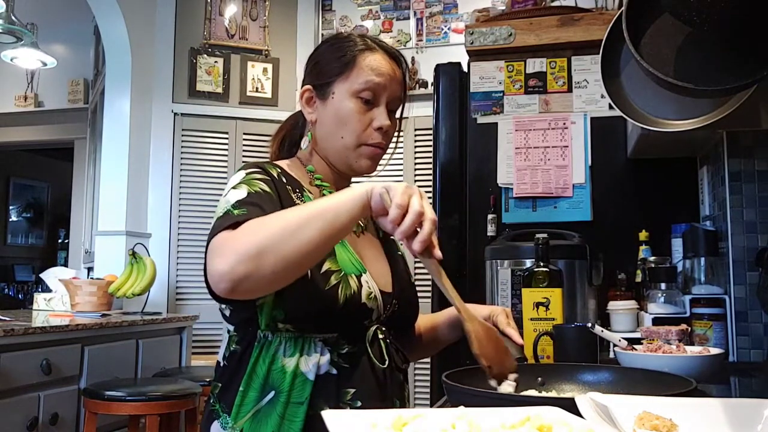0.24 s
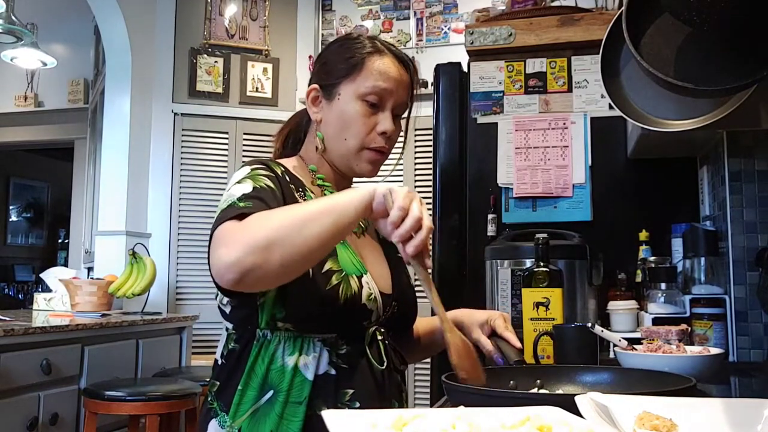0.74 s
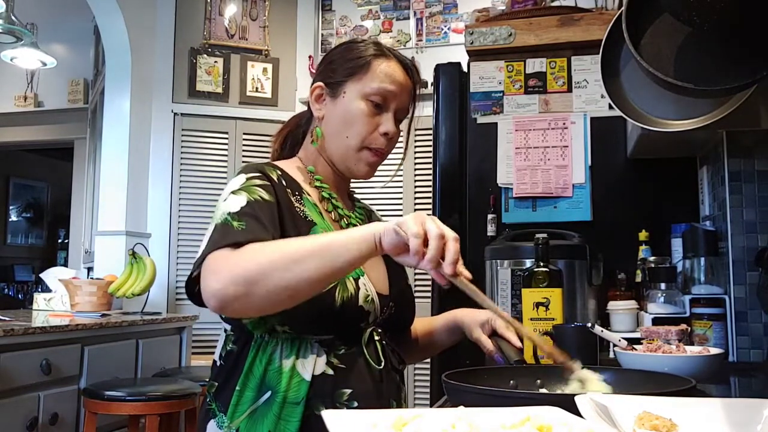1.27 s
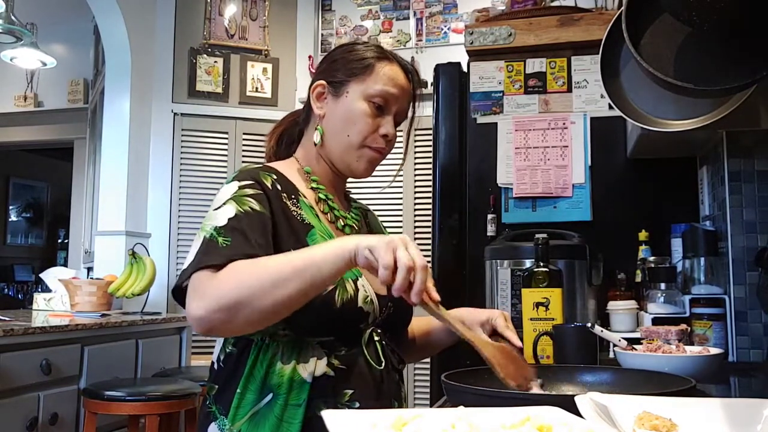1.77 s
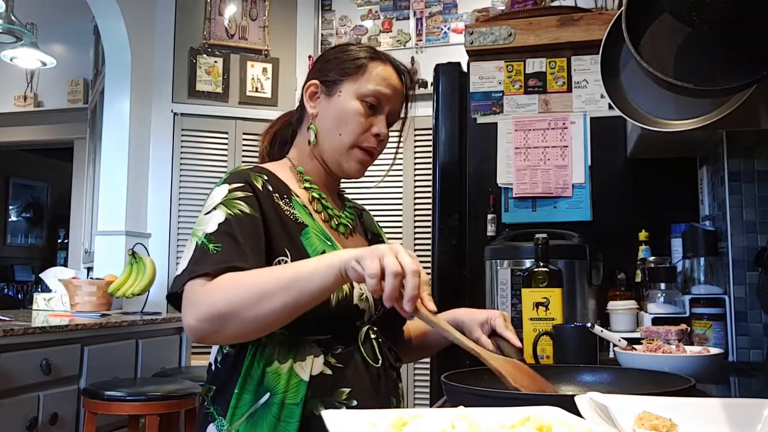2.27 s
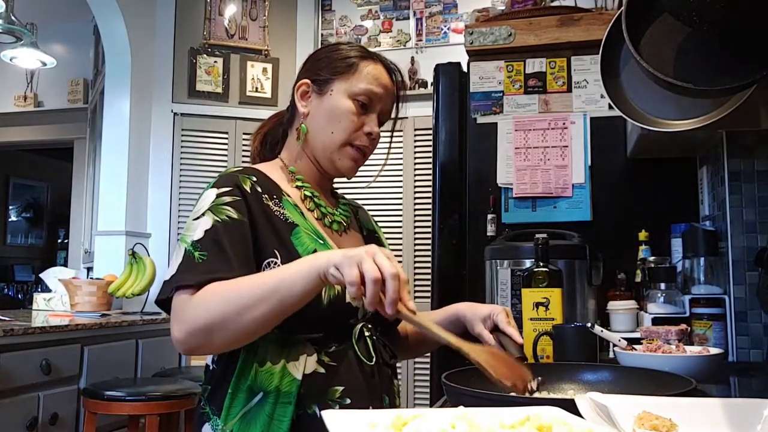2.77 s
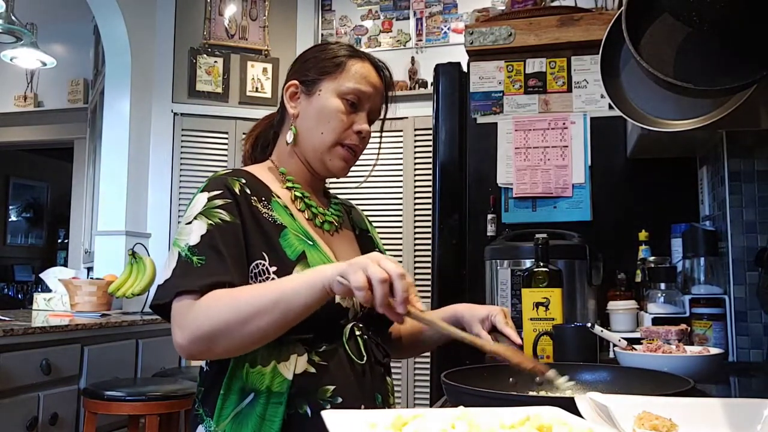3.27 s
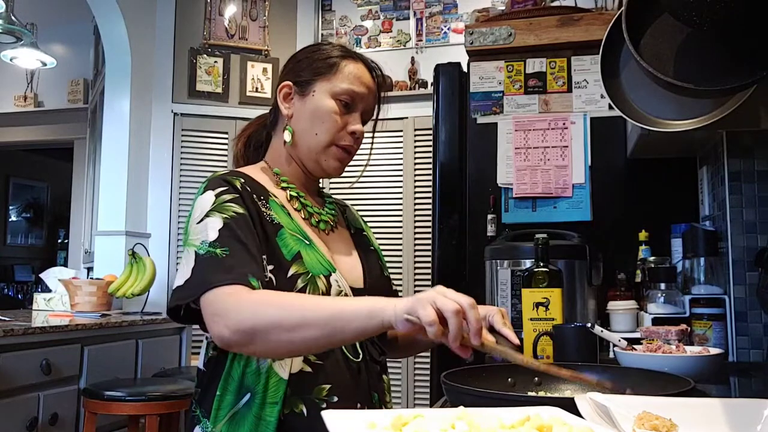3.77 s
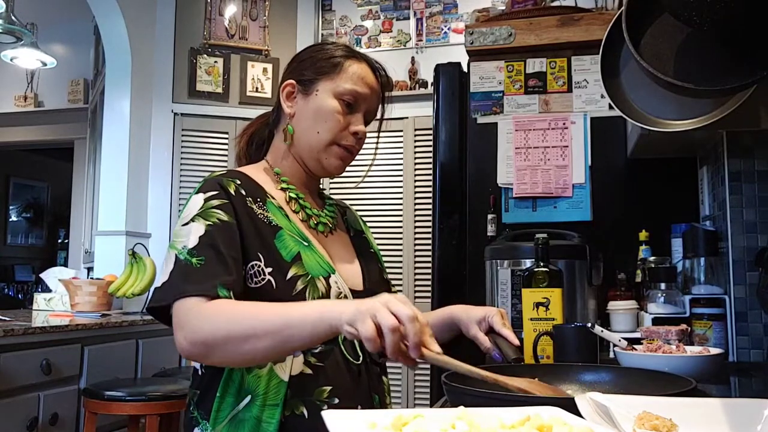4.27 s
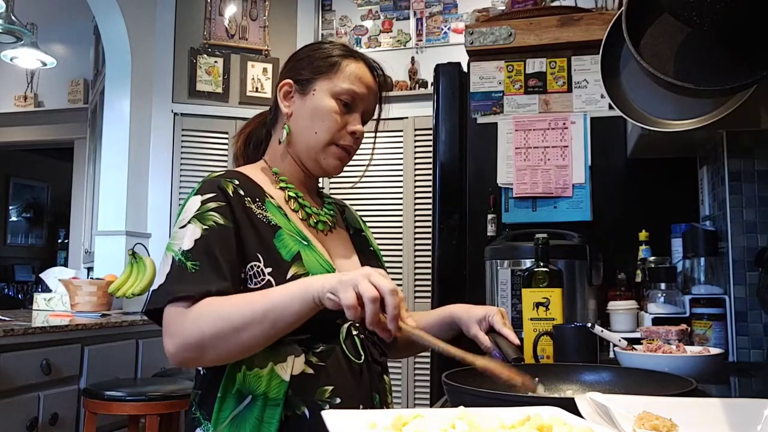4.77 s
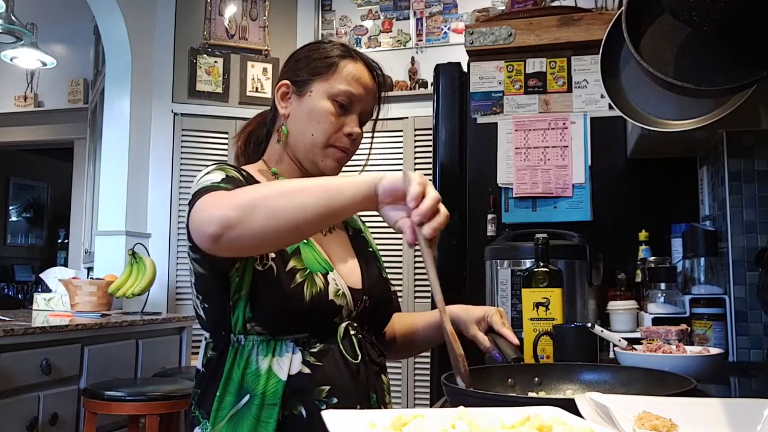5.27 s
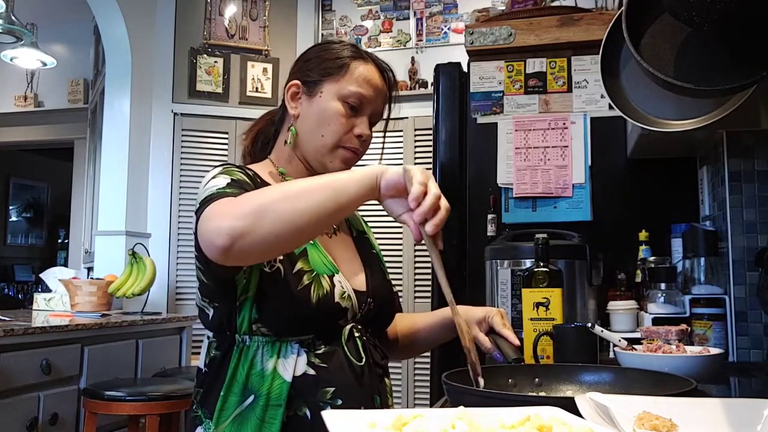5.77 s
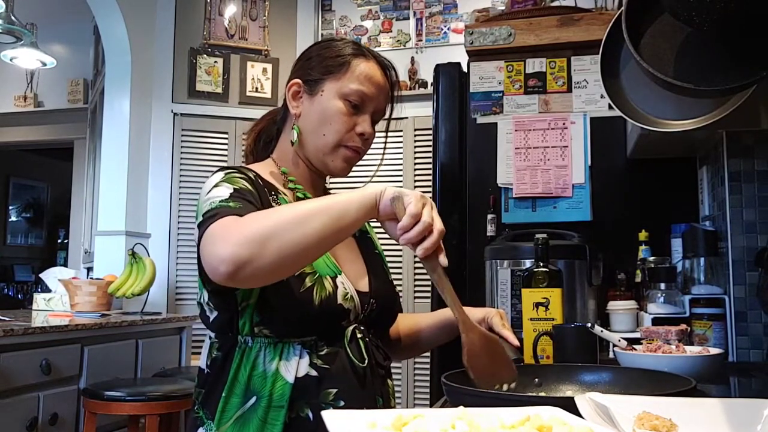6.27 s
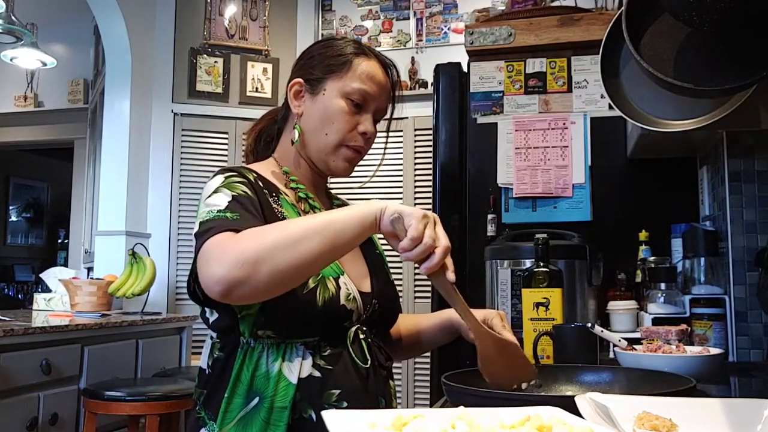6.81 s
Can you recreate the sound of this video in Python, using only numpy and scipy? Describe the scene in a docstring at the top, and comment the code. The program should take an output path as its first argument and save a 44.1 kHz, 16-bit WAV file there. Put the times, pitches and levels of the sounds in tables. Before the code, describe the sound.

Onions fry with a steady, fine, bright sizzle and low crackle, heard close in stereo, the left side edged with a whistling treble. A low appliance hum and rumble sit faintly behind. From 0 to 1.2 seconds a wooden spatula knocks the pan's floor and rim irregularly, with hollow tocks, short clacks and noisy tails; the strongest fall near 0.1, 0.5 and 1.1. From 1.2 to 2.2 soft swishes sweep onions over hot metal, with a duller tap at 1.4. Knocks return around 2.6 to 3.1, then another swish. Around 4 the pan rocks with low thuds and more swishing; taps follow at 4.3 and 4.65, and a sharp oil spit snaps at 4.7. From 5.1 to 6.5 tapping becomes frequent, strongest near 6.0. It then settles to sizzling, with a tiny spit near 6.9 and a final dull knock at 7.0. Short kitchen echoes follow the blows.

```python
"""Onions sizzle in a frying pan in a home kitchen: random steam pops over hiss.
A wooden spatula stirs them, knocking on the pan's floor and rim: decaying modes, bursts and a noisy tail.
The pan rocks on its grate, the stove thuds under it, and oil spits now and then as short noise bursts.
Behind them an appliance hums in sines over a noise rumble. Room echoes follow every blow and spit.
A stereo microphone pair listens close by; its left port whistles with a strong treble resonance."""
import sys
import numpy as np
from scipy import signal
from scipy.fft import rfft, irfft, next_fast_len
from scipy.io import wavfile
from scipy.ndimage import uniform_filter1d, map_coordinates

SR = 44100
rng = np.random.default_rng(int(sys.argv[2]) if len(sys.argv) > 2 else 0)


def to_wav(sig):
    """Store sig (one row per channel, or 1-D mono) as 16-bit WAV at the path in sys.argv[1].

    Samples outside -1..1 are clipped; the rate is SR.
    """
    pcm = np.clip(np.atleast_2d(sig), -1, 1) * 32767
    pcm = np.round(pcm).astype(np.int16)
    wavfile.write(sys.argv[1], SR, pcm.T)  # frames by channels


N = 310720
RING = np.arange(17000) / SR  # time after a blow [s]
# rows that set left and right apart
LEFT_RIGHT = np.array([[1], [-1]])


def amp(db):
    """Decibels to gain."""
    return 10 ** (np.asarray(db) / 20)


def unit(x):
    """x at rms 1."""
    return x / np.sqrt(np.mean(x ** 2) + 1e-20)


def crest(x, size=350):
    """A stereo blow scaled so that its loudest moment, size samples long, has rms 1."""
    power = uniform_filter1d(np.mean(x ** 2, 0), size)
    return x / np.sqrt(power.max() + 1e-20)


def along(points, hz):
    """(frequency, value) points read on a log frequency axis."""
    f, v = np.transpose(points)
    return np.interp(np.log(hz + 1), np.log(f + 1), v)


def wobble(rate):
    """A smooth random curve, rate knots a second."""
    knots = rng.standard_normal(int(N * rate / SR) + 4)
    return map_coordinates(knots, [np.arange(N) * rate / SR])


def filtered(x, response, size=8192):
    """x times a response of frequency."""
    m = next_fast_len(x.shape[-1] + size)
    spectrum = rfft(x, m) * response(np.fft.rfftfreq(m, 1 / SR))
    return irfft(spectrum, m)[..., :x.shape[-1]]


def add(track, s, sound):
    """Mix a sound into the track at time s."""
    part = track[:, max(round(s * SR), 0):][:, :sound.shape[1]]
    part += sound[:, :part.shape[1]]


# how alike the two microphones hear: (frequency [Hz], left-right likeness [-1 to 1])
LIKENESS = [(110, 0.98), (280, 0.96), (600, 0.55), (1200, 0.068), (2200, -0.17), (4000, -0.038)]


def port_angle(hz):
    """Half the angle between the ports' signals, whose cosine is their likeness."""
    return np.arccos(np.clip(along(LIKENESS, hz), -1, 1)) / 2


def spread(pair, spectrum):
    """Two unrelated signals become a coloured stereo sound of rms 1, alike in the bass."""
    def mid_side(hz):
        angle = port_angle(hz)
        return amp(along(spectrum, hz)) * [np.cos(angle), np.sin(angle)]

    mid, side = filtered(pair, mid_side)
    return unit(np.array([mid + side, mid - side]))


def ring(modes, scatter_db, attack, detune=0.012):
    """A struck body: each blow shifts its modes' strength and pitch; high modes reach the ports out of step."""
    hz, db, t60 = np.transpose(modes)[:, :, None]
    size = amp(db + scatter_db * rng.standard_normal(hz.shape) - 60 * RING / t60)
    apart = port_angle(hz) * rng.choice([-1, 1], hz.shape)
    detuned = hz * (1 + detune * rng.standard_normal(hz.shape))
    phase = 2 * np.pi * (detuned * RING + rng.random(hz.shape))
    pair = np.array([np.sum(size * np.sin(phase + side * apart), 0) for side in (1, -1)])
    return crest(pair * (1 - np.exp(-RING / attack)))


def favoured(modes, place_hz, slope_db):
    """The place of a blow favours the modes near one pitch; the others fall by slope_db an octave."""
    return [(hz, db - slope_db * abs(np.log2(hz / place_hz)), t60) for hz, db, t60 in modes]


def burst(spectrum, t60, attack=0.0013):
    """Dense, quickly dying modes of a contact, drawn as coloured noise."""
    noise = spread(rng.standard_normal((2, len(RING))), spectrum)
    return crest(noise * amp(-60 * RING / t60) * (1 - np.exp(-RING / attack)))


# how long the kitchen rings: (frequency [Hz], t60 [s])
ROOM_DECAY = [(90, 0.7), (350, 0.39), (900, 0.36), (3000, 0.4), (10000, 0.13)]


def kitchen(x, wet_db, early_db=-9, delay=0.0066):
    """A blow with quick echoes off the counter and the room's answer, drawn anew each time."""
    white = spread(rng.standard_normal((2, len(RING))), [(1, 0)])
    hz, t, z = signal.stft(white, SR, nperseg=256)
    decayed = z * amp(-60 * t / along(ROOM_DECAY, hz)[:, None])
    tail = signal.istft(decayed, SR, nperseg=256)[1][:, :len(RING)]
    tail = tail * (1 - np.exp(-(RING / delay) ** 2))
    near = rng.standard_normal(tail.shape) * (RING > 0.002) * amp(-60 * RING / 0.051)
    # both answers are scaled by their left channel
    answer = amp(wet_db) * tail / np.linalg.norm(tail[0]) + amp(early_db) * near / np.linalg.norm(near[0])
    return x + signal.fftconvolve(x, answer, axes=1)[:, :len(RING)]


# the appliance's tones, ahead of the microphones: (frequency [Hz], level [dB])
HUM_TONES = [(39.5, -58.5), (79, -62), (120, -67.5)]
# the room's low rumble: (frequency [Hz], relative density [dB per Hz])
ROOM_RUMBLE = [(15, -22), (28, -4), (43, 10.5), (60, -25), (82, 3), (120, -4.5), (170, -23), (290, -9),
               (420, -17.5), (850, -19), (2000, -27)]


def appliance():
    """A motor hums, unsteady in level and phase, over the room's low rumble."""
    t = np.arange(N) / SR
    hum = np.zeros(N)
    for hz, db in HUM_TONES:
        level = amp(db + 0.31 * wobble(3.15)) * np.sqrt(2)
        hum += level * np.sin(2 * np.pi * hz * t + 0.32 * wobble(2.95))
    return hum + amp(-56.5) * spread(rng.standard_normal((2, N)), ROOM_RUMBLE)


# modes of the stove top: (frequency [Hz], relative level [dB], t60 [s])
STOVE_MODES = [(77.6, -6.5, 0.2), (90.7, 1.5, 0.18), (120, -2, 0.13)]


def stove_thud():
    """The stove top swings slowly into its low modes."""
    return ring(STOVE_MODES, scatter_db=3.5, attack=0.0058)


# modes of the pan's body: (frequency [Hz], relative level [dB], t60 [s])
PAN_MODES = [(240.7, -6.5, 0.19), (292.7, 2.5, 0.16), (347.4, -2, 0.18), (415.4, -9.5, 0.14),
             (490.4, -3.5, .11)]
# the pan's thump on the grate: (frequency [Hz], relative density [dB per Hz])
GRATE_THUMP = [(130, -23), (200, -8.5), (300, 2), (420, 1.5), (600, 1), (900, -29)]


def pan_body():
    """The pan bends and thumps on its grate."""
    bend = ring(PAN_MODES, scatter_db=2.5, attack=0.0055, detune=0.0049)
    thump = burst(GRATE_THUMP, t60=0.26, attack=0.00083)
    return crest(bend + amp(-3.5) * thump)


# the pushed pan rocks on its grate: (time [s], stove level [dB], pan level [dB]), ahead of the echoes
PAN_ROCKS = [(0.399, -42, -52), (0.568, -44, -65), (0.73, -41, -47), (1.404, -49, -41.5), (1.76, -48, -72),
             (2.248, -43.5, -62), (2.525, -51, -49.5), (3.148, -43, -40.5), (3.456, -44.5, -65),
             (3.765, -47, -51), (3.982, -37, -44.5), (4.193, -37, -54), (4.318, -44, -41),
             (4.769, -51, -43.5), (4.853, -51, -43), (6.763, -43.5, -72)]


def rocks():
    """Pushing the onions tips the pan softly against the grate."""
    out = np.zeros((2, N))
    for s, stove_db, pan_db in PAN_ROCKS:
        low = amp(stove_db) * stove_thud() + amp(pan_db) * pan_body()
        add(out, s, kitchen(low, wet_db=-17, early_db=-22))
    return out


# oil spits: (time [s], level [dB]), ahead of the echoes
OIL_SPITS = [(4.5922, -40.5), (4.7062, -26.5), (4.8737, -43), (6.8625, -42.5)]
# colour of a spit: (frequency [Hz], relative density [dB per Hz])
SPIT_COLOUR = [(1000, -9), (3000, 2.5), (5000, 2), (8500, 0), (11000, -19), (15000, -17)]


def spits():
    """Larger drops of water burst in the hot oil."""
    out = np.zeros((2, N))
    for s, db in OIL_SPITS:
        spit = amp(db) * burst(SPIT_COLOUR, t60=0.025, attack=0.00057)
        add(out, s, kitchen(spit, wet_db=-4.0, early_db=-5.5))
    return out


# modes of the wooden spatula: (frequency [Hz], relative level [dB], t60 [s])
SPATULA_MODES = [(728, -1, 0.057), (774, -5, 0.029), (836, -3, 0.054), (879, -4.5, 0.065)]


def spatula_tock(spatula_hz):
    """The wooden spatula rings mostly near one pitch."""
    modes = favoured(SPATULA_MODES, spatula_hz, slope_db=46.0)
    return ring(modes, scatter_db=1.5, attack=0.00063, detune=0.0023)


# modes of the pan's floor: (frequency [Hz], relative level [dB], t60 [s])
FLOOR_MODES = [(590, -9.5, 0.023), (641, -1.5, 0.023), (910, -14.5, 0.052), (1064, -0.5, 0.038),
               (1150, -6, 0.069), (1275, -4.5, 0.044), (1406, -16.5, 0.052), (1526, -15.5, 0.068)]
# clatter of wood on the floor: (frequency [Hz], relative density [dB per Hz])
FLOOR_CLATTER = [(200, -5.5), (450, -3), (900, 5.5), (1250, 2), (1650, -2), (2200, -15), (3000, -34)]


def floor_clack():
    """The pan's floor rings briefly under a clatter."""
    tone = ring(FLOOR_MODES, scatter_db=4.5, attack=0.0005)
    return crest(tone + amp(-1.5) * burst(FLOOR_CLATTER, t60=0.15, attack=0.00022))


# modes of the pan's rim: (frequency [Hz], relative level [dB], t60 [s])
RIM_MODES = [(2263, -5, 0.12), (2357, 1, 0.16), (2424, -2, 0.074), (2612, 3, 0.038), (2953, 1, 0.061)]


def rim_ring(place_hz):
    """The pan's rim, struck at one place."""
    modes = favoured(RIM_MODES, place_hz, slope_db=14)
    return ring(modes, scatter_db=5.5, attack=0.0011, detune=0.0059)


# spatula on pan: (time [s], strength [dB], weight behind the blow [0-1],
# hardness [0 on onion to 1 on bare metal], place [0 floor to 1 rim], spatula pitch [Hz])
SPATULA_KNOCKS = [(0.001, -40, 0.29, 0.43, 0.78, 734), (0.075, -33.5, 1, 0.36, 0.17, 818.0),
                  (0.121, -27.0, 0.71, 0.65, 0.45, 890.0), (0.351, -39.5, 0.35, 0.51, 0.69, 800),
                  (0.488, -27.5, 0.82, 0.54, 0.42, 899.0), (0.683, -35.5, 0.63, 0.7, 0.46, 860),
                  (0.808, -38.0, 1, 0.43, 0.51, 686.0), (1.012, -31, 0.58, 0.86, 0.54, 894.0),
                  (1.093, -27.5, 1, 0.19, 0.21, 912.0), (1.146, -26.5, 0.98, 0.64, 0.32, 880.0),
                  (1.439, -36.5, 0.58, 0.12, 0.32, 850.0), (2.609, -30.5, 0.6, 0.45, 0.42, 888.0),
                  (2.809, -34, 0.5, 0.072, 0.65, 760), (3.083, -36, 0.0, 0.4, 0.073, 834.0),
                  (3.921, -51.5, 0.46, 0.44, 0.098, 825), (4.29, -33, 0.2, 0.55, 0.23, 710.0),
                  (4.559, -40, 0.01, 0.49, 0.061, 750), (4.649, -30.5, 0.63, 0.3, 0.38, 870),
                  (5.106, -39.0, 0.36, 1.0, 0.57, 833), (5.303, -38.0, 0.68, 0.0, 0.57, 814),
                  (5.382, -31.5, 0.63, 0.36, 0.3, 890), (5.555, -37.0, 0.25, 0.91, 0.45, 777),
                  (5.902, -33.0, 0.47, 0.67, 0.82, 790), (6.013, -28.5, 0.94, 0.59, 0.27, 850),
                  (6.168, -35.0, 0.59, 0.0, 0.94, 845.0), (6.3, -38.5, 0.97, 0.33, 0.37, 912.0),
                  (6.457, -40.5, 0.73, 0, 1.0, 850), (7.007, -33.5, 0.58, 0.0, 0.89, 845)]
# how each part answers a blow: (level over its strength [dB], added by full weight [dB],
# by full hardness [dB], at the rim [dB])
PART_ANSWERS = {"stove": (-11, 11, -1, 2.5), "pan": (-5, 6, 0.5, -1), "spatula": (13.5, -21, 0, 0),
                "floor": (10, 1, -0.5, -23.5), "rattle": (-1.5, 0.5, 20.5, -32), "rim": (-25, -1, 27, 6.5),
                "click": (-47.5, 22.5, 34, -4.5)}
# rattle of spatula against pan, fading towards the rim: (frequency [Hz], relative density [dB per Hz])
RATTLE_COLOUR = [(1000, -33), (1550, -34), (1850, 3), (2300, -4), (2750, -4.5), (3300, -8), (6000, -56)]
# click of a hard contact: (frequency [Hz], relative density [dB per Hz])
CLICK_COLOUR = [(1500, -32), (3200, 9.5), (5000, 10), (7000, 0), (10000, -29), (15000, -30)]
RIM_HZ, RIM_SAG_HZ = 2850, 700  # the rim's favoured pitch at no weight; its fall under full weight
DULL_HZ, BITE_OCTAVES = 2570, 2.6  # treble edge of a cushioned blow; its rise for a hard, heavy one
RIM_LEFT_DB = 4.2  # left over right, for the tock and clack of a blow at the rim; the floor is central


def knocks():
    """Light taps ring mostly the wooden spatula; heavy blows also shake pan and stove, hard ones the rim."""
    out = np.zeros((2, N))
    for s, db, weight, hardness, place, spatula_hz in SPATULA_KNOCKS:
        blow = [1, weight, hardness, place]
        gain = {part: amp(db + np.dot(answer, blow)) for part, answer in PART_ANSWERS.items()}
        low = gain["stove"] * stove_thud() + gain["pan"] * pan_body()
        middle = gain["spatula"] * spatula_tock(spatula_hz) + gain["floor"] * floor_clack()
        middle = middle * amp(RIM_LEFT_DB * place * LEFT_RIGHT / 2)
        rattle = gain["rattle"] * burst(RATTLE_COLOUR, t60=0.08, attack=0.0017)
        rim = gain["rim"] * rim_ring(RIM_HZ - RIM_SAG_HZ * weight)
        click = gain["click"] * burst(CLICK_COLOUR, t60=0.1, attack=0.00054)
        # a light contact, or one cushioned by onion, cuts off the treble steeply
        corner_hz = DULL_HZ * 2 ** (BITE_OCTAVES * hardness * weight)
        high = filtered(rattle + rim + click, lambda hz: 1 / np.sqrt(1 + (hz / corner_hz) ** 20))
        add(out, s, kitchen(low, wet_db=-14.5, early_db=-25.0))
        add(out, s, kitchen(middle + high, wet_db=-7.8, early_db=-9.5))
    return out


# diffuse noisy tail after a knock: level relative to its strength, rise and fading time constants
TAIL_DB, TAIL_RISE_S, TAIL_FADE_S = -14, 0.024, 0.12


def knock_tails(t):
    """Level of the diffuse noisy tails: each rises after its knock and fades; their powers add."""
    power = np.zeros(N)
    for s, db, *_ in SPATULA_KNOCKS:
        age = np.clip(t - s, 0, 2)
        swell = (1 - np.exp(-age / TAIL_RISE_S)) * np.exp(-age / TAIL_FADE_S)
        power += (amp(db + TAIL_DB) * swell) ** 2
    return np.sqrt(power)


def bubbles(spectrum, rate, size_db, hiss_db):
    """Tiny steam bubbles burst at random, rate a second, over the blur of their own echoes."""
    sizes = amp(size_db * rng.standard_normal((2, N)).clip(-3, 3))
    pops = (rng.random((2, N)) < rate / SR) * rng.choice([-1, 1], (2, N)) * sizes
    return spread(unit(pops) + amp(hiss_db) * rng.standard_normal((2, N)), spectrum)


# onions swept over hot metal: (time of the middle [s], time from there to 1/e [s], level [dB])
ONION_SWISHES = [(1.245, 0.16, -46.5), (1.49, 0.092, -40.5), (1.835, 0.087, -40.5), (2.11, .077, -41),
                 (2.816, 0.045, -51), (3.177, .068, -45), (3.982, 0.16, -45), (4.175, 0.086, -44.5),
                 (4.81, 0.14, -46), (5.56, 0.092, -46.5), (6.644, 0.14, -60)]
# colour of a swish: (frequency [Hz], relative density [dB per Hz])
SWISH_COLOUR = [(500, -40), (1500, -3.5), (2500, 1.5), (4500, 0), (6500, -4), (10000, -6), (15000, -5.5)]
# colour of the fine sizzle: (frequency [Hz], relative density [dB per Hz])
SIZZLE_COLOUR = [(200, -26), (700, -29), (1500, -15), (2500, 1), (3500, -2.5), (5000, 0.5), (6500, -4),
                 (9000, -2.5), (12500, -3.5), (15500, -2.5)]
# colour of the low crackle and the knocks' tails: (frequency [Hz], relative density [dB per Hz])
CRACKLE_COLOUR = [(150, -14), (400, -11.5), (900, -4), (1500, -5), (2200, 1), (3000, -2.5), (4500, -6.5),
                  (9000, -28)]
SIZZLE_DB, CRACKLE_DB = -42.5, -48.5  # fine sizzle and low crackle of onions at rest, before they flare


def frying():
    """A fine sizzle, a low crackle that carries the knocks' noisy tails, and swishes of onion on hot metal."""
    t = np.arange(N) / SR
    # pockets of moisture flare up and dry out [dB]
    flare = 0.3 * wobble(3) + 0.35 * wobble(9) + 0.5 * wobble(35)
    sizzle = amp(SIZZLE_DB + flare) * bubbles(SIZZLE_COLOUR, rate=2500, size_db=2.5, hiss_db=5.0)
    crackle_level = np.hypot(amp(CRACKLE_DB), knock_tails(t)) * amp(flare)
    crackle = crackle_level * bubbles(CRACKLE_COLOUR, rate=700, size_db=2.5, hiss_db=3.5)
    sweep = np.zeros(N)
    for middle, length, db in ONION_SWISHES:
        sweep += amp(db) * np.exp(-np.minimum(((t - middle) / length) ** 2, 20))
    swish = sweep * amp(2.2 * wobble(45)) * bubbles(SWISH_COLOUR, rate=1500, size_db=3.5, hiss_db=5.5)
    return sizzle + crackle + swish


def scene():
    """Everything at the stove, from the background to the onions."""
    return appliance() + rocks() + spits() + knocks() + frying()


# colour of the whistling left port: (frequency [Hz], gain [dB])
LEFT_PORT = [(800, 2), (1200, 0.5), (2000, 2.5), (5600, 1), (6250, 13.5), (6650, 19), (7100, 11.5),
             (7650, 2), (9000, 4.5), (10300, 0.5), (11300, -11), (12200, 4.5), (15000, 0)]
# colour of the right port: (frequency [Hz], gain [dB])
RIGHT_PORT = [(700, 1), (1200, 5.5), (2000, 2), (5200, 2.5), (6800, 3), (7850, -8), (8600, 0),
              (10100, -4.5), (11200, -4.5), (12200, 0.5), (15000, 0.5)]
TOP_HZ = 15780  # band limit of both microphones


def record(dry):
    """Each microphone port has its own treble resonances; nothing passes above the band limit."""
    return filtered(dry, lambda hz: amp([along(LEFT_PORT, hz), along(RIGHT_PORT, hz)]) * (hz < TOP_HZ))


dry = scene()
out = record(dry)
to_wav(out)
```